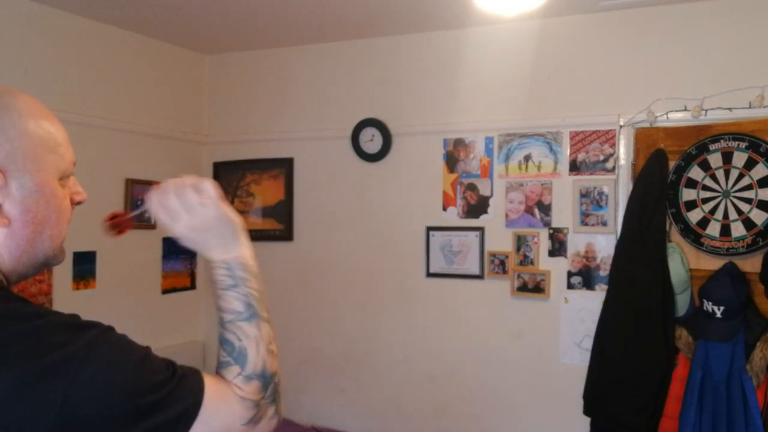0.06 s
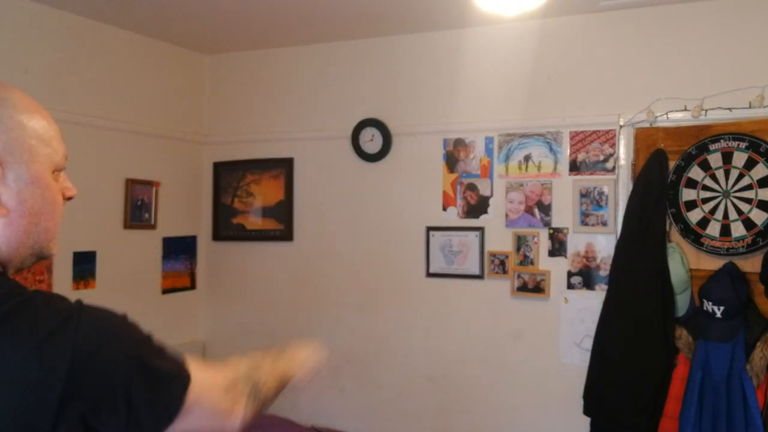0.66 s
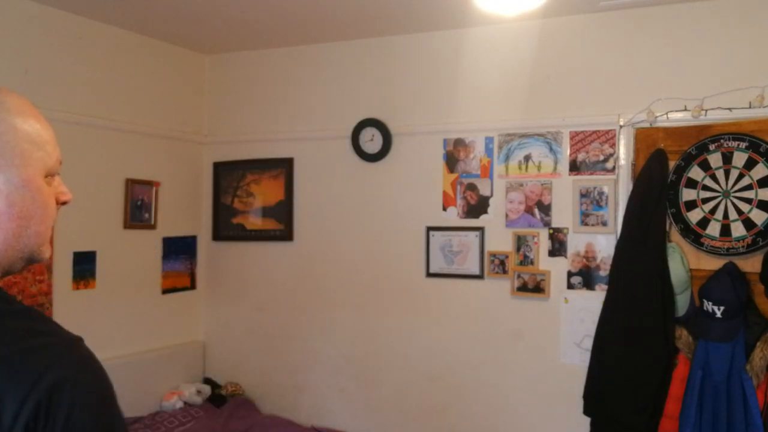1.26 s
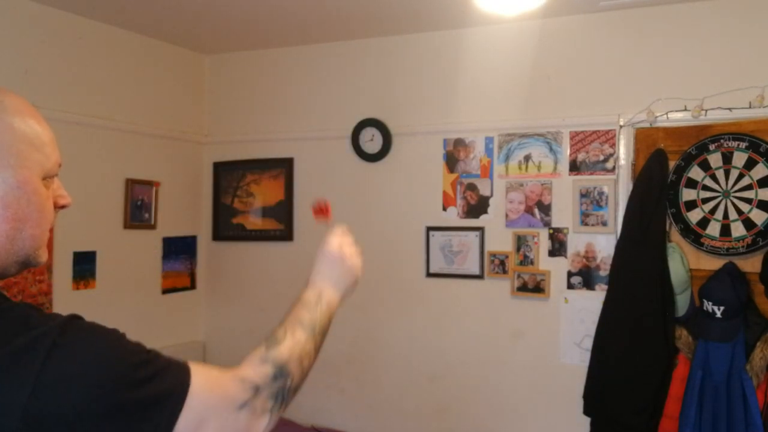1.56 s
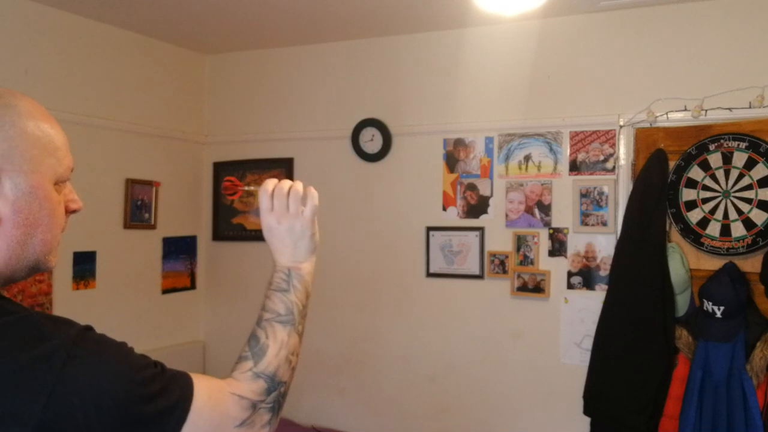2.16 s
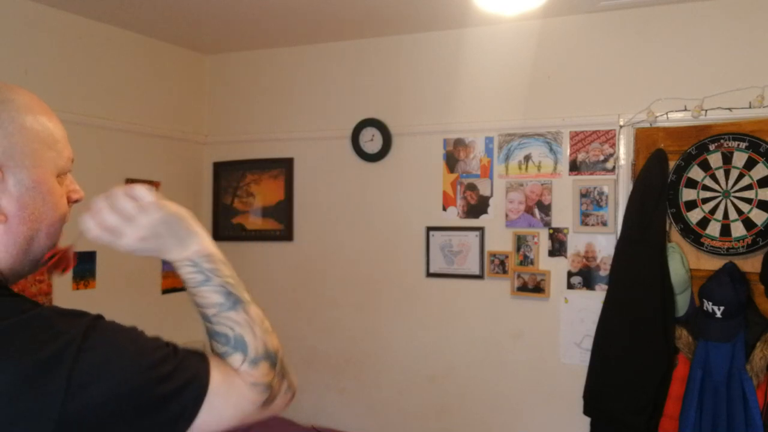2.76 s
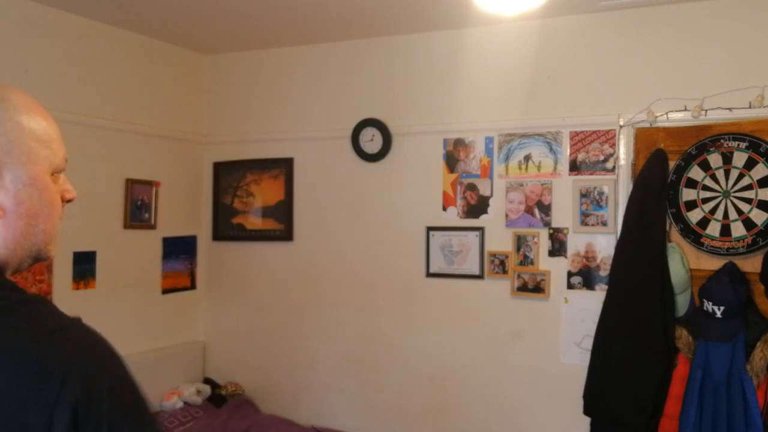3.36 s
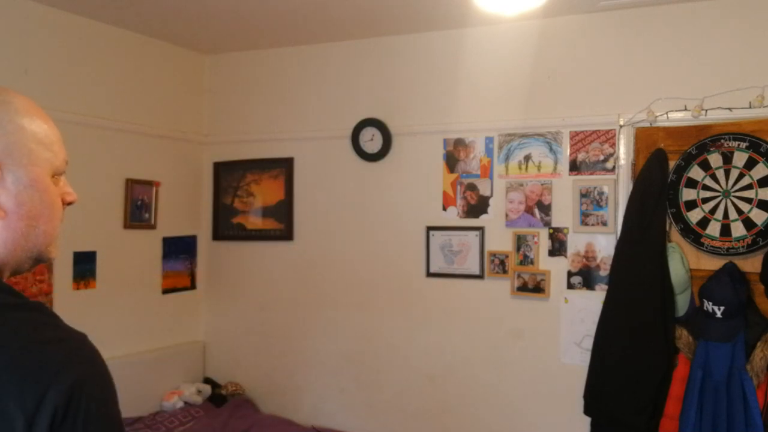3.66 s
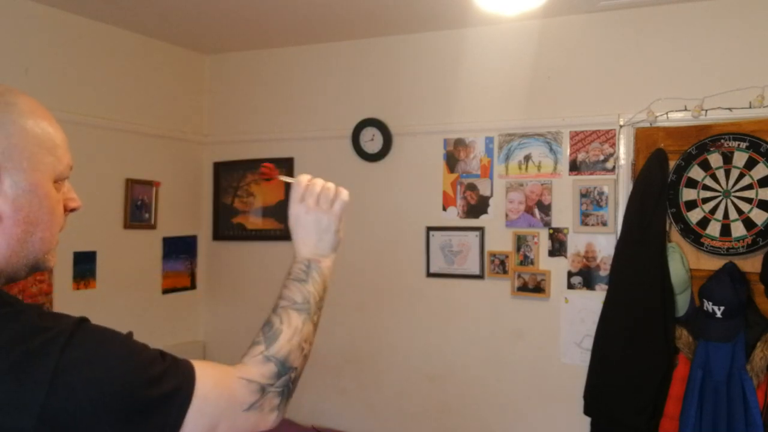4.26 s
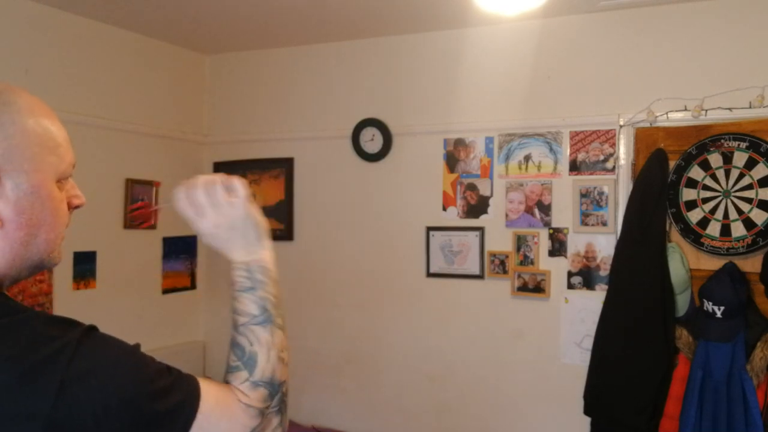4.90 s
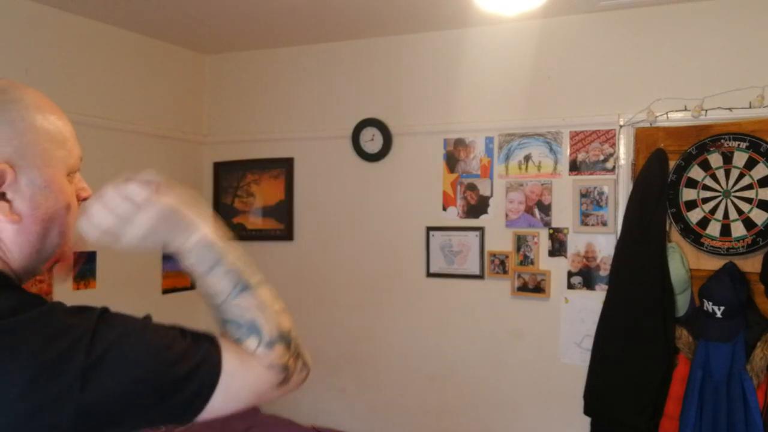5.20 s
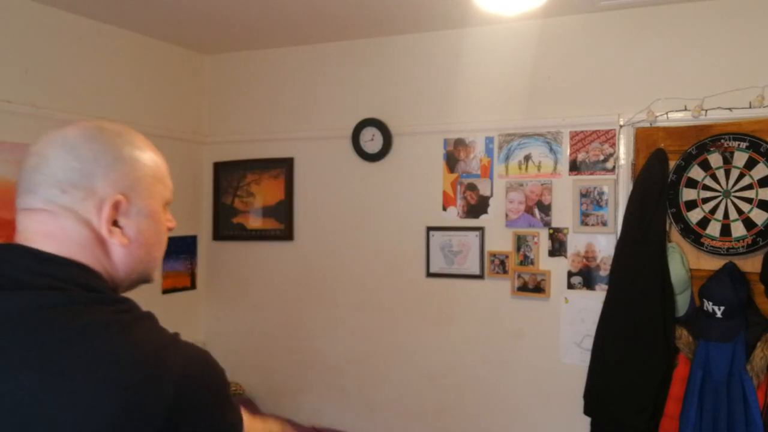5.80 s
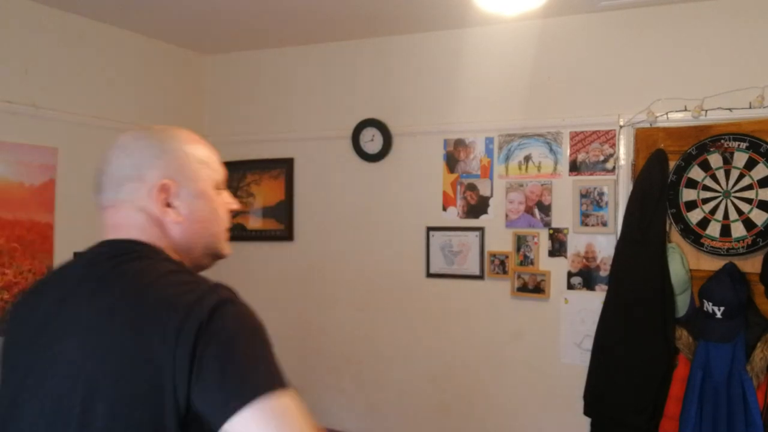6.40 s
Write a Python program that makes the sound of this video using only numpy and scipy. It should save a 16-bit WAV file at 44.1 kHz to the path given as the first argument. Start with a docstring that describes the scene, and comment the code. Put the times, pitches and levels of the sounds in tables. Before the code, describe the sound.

In a small, quiet bedroom, three darts thud into a bristle board on a wooden door, about two and a half seconds apart. Each lands with a knock and a short low boom, and the last two add a brief rattle and a sharp tick. The thrower's clothes brush faintly, with soft knocks underfoot and a rustle at the end. A fan hums very faintly in the stereo room tone.

```python
"""In a small, quiet bedroom, three darts thud into a bristle board hung on a wooden door. Each impact excites
free vibration: the flight rattles, the steel point ticks, the board's knock rings in the room's resonances and
the low modes of door and room boom; reflections and a short reverberation follow. The thrower moves with soft
brushing sounds and dull knocks underfoot, then rustles and steps forward. A small fan hums faintly in the
steady room tone."""
import sys
import numpy as np
from scipy import signal
from scipy.fft import rfft, irfft, next_fast_len
from scipy.io import wavfile
from scipy.ndimage import uniform_filter1d

SR = 44100
rng = np.random.default_rng(int(sys.argv[2]) if len(sys.argv) > 2 else 0)


def waveform_to_disk(signal):
    """Save audio, clipped to [-1, 1], as 16-bit WAV at the path in sys.argv[1]."""
    frames = np.transpose(np.atleast_2d(signal))
    scaled = np.clip(frames, -1, 1) * 32767
    samples = np.round(scaled).astype(np.int16)
    wavfile.write(sys.argv[1], SR, samples)


N = 284129
TIME = np.arange(N) / SR
NOISE_HZ = np.fft.rfftfreq(2 * next_fast_len(N), 1 / SR)
RING_SIZE = 32768   # samples allowed for a free decay
RING_TIME, RING_HZ = TIME[:RING_SIZE], np.fft.rfftfreq(RING_SIZE, 1 / SR)


def from_db(db):
    """Amplitude ratio: a factor of ten for every 20 dB."""
    return 10 ** (np.asarray(db) / 20)


def unit_rms(x):
    """Normalisation to unit mean power."""
    return x / np.sqrt(np.mean(x ** 2) + 1e-20)


def at_hz(points, hz):
    """Interpolation of a table on a log-frequency axis."""
    frequencies, values = np.transpose(points)
    return np.interp(np.log(np.maximum(hz, 1)), np.log(frequencies), values)


def add(out, start_s, sound):
    """Superposition: a sound joins the mix at its start time."""
    start = int(round(start_s * SR))
    out[:, start:start + sound.shape[-1]] += sound[..., :N - start]


def soften(x, cutoff_hz):
    """Low-pass filtering: a soft contact carries little treble."""
    return signal.sosfilt(signal.butter(2, cutoff_hz, fs=SR, output="sos"), x)


def click(spectrum):
    """Minimum phase: the shortest causal pulse that has this spectrum."""
    cepstrum = irfft(np.log(from_db(at_hz(spectrum, RING_HZ))))
    cepstrum[1:] *= 2
    return irfft(np.exp(rfft(cepstrum[:RING_SIZE // 2], RING_SIZE)))


def decay(t60_s):
    """Exponential damping: a fall of 60 dB in t60_s."""
    return from_db(-60 * RING_TIME / t60_s)


def ring(modes):
    """Free vibration: each struck mode is a damped sinusoid."""
    return sum(np.sign(polarity) * from_db(level_db) * decay(t60_s) * np.sin(2 * np.pi * hz * RING_TIME)
               for hz, level_db, t60_s, polarity in modes)


def whitened(sound):
    """Whitening: many paths or contacts share energy evenly, giving a spectrum without broad bumps."""
    spectrum = rfft(sound, RING_SIZE)
    smooth_power = uniform_filter1d(uniform_filter1d(np.abs(spectrum) ** 2, size=35), size=35)
    return spectrum / np.sqrt(smooth_power)


def left_right(mid, side, correlation):
    """Partial coherence: mid and side spectra mix into a stereo pair with this correlation."""
    return irfft(np.sqrt((1 + correlation) / 2) * mid + np.sqrt((1 - correlation) / 2) * side * [[1], [-1]])


def stereo_noise(gain, correlation):
    """Spectral shaping: noise of unit rms with a gain and a correlation at each frequency."""
    mid, side = gain * rfft(rng.standard_normal((2, 2 * len(gain) - 2)))
    return unit_rms(left_right(mid, side, correlation))


# background rumble and hiss: frequency_hz, relative_density_db
AIR_SPECTRUM = [(12, -43), (20, 2), (22, -15), (42, -5), (144, -9.5), (238, -9.5), (274, -18.5), (324, -15),
                (416, -14.5), (667, -15), (725, -17.5), (1040, -16), (2150, -21), (8880, -22.5),
                (15500, -31.5)]
# likeness of the background at left and right: frequency_hz, correlation
AIR_CORRELATION = [(60, 1), (180, 0.88), (550, -0.76), (1650, 0.06), (4970, -0.02), (15000, -0.2)]
# the fan's noise bands: centre_hz, half_width_hz, level_db
FAN_BANDS = [(47, 6, -76.5), (105.3, 9.2, -79), (243.6, 14, -85.5), (3320, 300, -85.5)]

def room_tone(air_db=-69):
    """Incoherent addition: the background and the fan's noise bands sum in power."""
    power = (from_db(air_db) * unit_rms(from_db(at_hz(AIR_SPECTRUM, NOISE_HZ)))) ** 2
    for centre_hz, half_width_hz, level_db in FAN_BANDS:
        band = unit_rms(1 / (1 + ((NOISE_HZ - centre_hz) / half_width_hz) ** 2))
        power += (from_db(level_db) * band) ** 2
    noise = stereo_noise(np.sqrt(power), at_hz(AIR_CORRELATION, NOISE_HZ))
    return np.sqrt(power.mean()) * noise[:, :N]


# the fan's tones: harmonic_number, level_db
FAN_HARMONICS = [(5, -86), (14, -93), (21, -93), (22, -94), (23, -102.5), (24, -96)]

def fan(rotation_hz=48.8):
    """Periodic rotation radiates harmonics of its rate, in a different phase at left and right."""
    out = np.zeros((2, N))
    for harmonic, level_db in FAN_HARMONICS:
        cycles = round(harmonic) * rotation_hz * TIME + rng.random((2, 1)) / 4
        out += np.sqrt(2) * from_db(level_db) * np.sin(2 * np.pi * cycles)
    return out


# hiss of a brushing stroke: frequency_hz, relative_density_db
BRUSH_SPECTRUM = [(60, -55.5), (220, -22), (400, -4), (1200, -7.5), (2200, -10.5), (4500, -10),
                  (7500, -10.5), (9500, -7), (11500, -21), (15000, -23)]
# strokes as the thrower moves: peak_s, level_db, time_constant_s, bright_hz
BRUSH_STROKES = [(.55, -75, 0.065, 9000), (.655, -74, .035, 4000), (1.205, -74, 0.027, 6500),
                 (3.109, -76.5, 0.054, 8900), (6.244, -56.5, 0.035, 7300)]

def brushing(lift_db=7, half_width_octaves=0.23):
    """Amplitude-modulated noise: each stroke swells and fades exponentially, with one band lifted."""
    out = np.zeros((2, N))
    hz = np.fft.rfftfreq(2 * next_fast_len(N // 2 + 1), 1 / SR)
    for peak_s, level_db, time_constant_s, bright_hz in BRUSH_STROKES:
        octaves = np.log2(np.maximum(hz, 1) / bright_hz)
        band_db = lift_db / (1 + (octaves / half_width_octaves) ** 2)
        hiss = stereo_noise(from_db(at_hz(BRUSH_SPECTRUM, hz) + band_db), correlation=0.18)[:, :N]
        out += from_db(level_db) * hiss * np.exp(-np.abs(TIME - peak_s) / time_constant_s)
    return out


# reverberation time by band: centre_hz, t60_s
REVERB_TIMES = [(100, 0.3), (400, 0.23), (1100, 0.22), (3000, 0.18), (8000, 0.18), (15000, 0.23)]
# direct sound and first reflections: left_delay_s, right_delay_s, relative_db
EARLY_PATHS = [(.0006, .0001, -16.5), (.0047, .0047, -16), (0.0112, .0112, -9.5)]
# likeness of the room's sound field at left and right: frequency_hz, correlation
ROOM_CORRELATION = [(120, 0.66), (230, .78), (340, 0.59), (500, 0.12), (770, 0.037), (1200, -0.086),
                    (2700, -0.24), (8000, 0)]

def through_room(sound, tail_db=-3, tail_rise_s=0.00061):
    """Convolution with the room's response: a few clear paths, then a diffuse tail dying band by band."""
    noise = rfft(rng.standard_normal((2, RING_SIZE)))
    centres_hz = [hz for hz, _ in REVERB_TIMES]
    tail = np.zeros((2, RING_SIZE))
    for weights, (_, t60_s) in zip(np.eye(len(centres_hz)), REVERB_TIMES):
        band = at_hz(list(zip(centres_hz, weights)), RING_HZ)
        tail += irfft(noise * band) * decay(t60_s)
    tail *= 1 - np.exp(-RING_TIME / tail_rise_s)
    left, right = from_db(tail_db) * unit_rms(tail) / np.sqrt(RING_SIZE)
    for left_delay_s, right_delay_s, relative_db in EARLY_PATHS:
        left[int(left_delay_s * SR)] += from_db(relative_db)
        right[int(right_delay_s * SR)] += from_db(relative_db)
    response = left_right(whitened(left + right), whitened(left - right), at_hz(ROOM_CORRELATION, RING_HZ))
    return signal.fftconvolve(sound[None], response[:, :RING_SIZE // 2], axes=1)


# one contact of flight and shaft: frequency_hz, level_db
RATTLE_SPECTRUM = [(600, -23.5), (2100, -17.5), (3100, 6.5), (4100, -6), (5200, 0), (6100, -1), (7000, 0),
                   (9000, -5), (10200, -3.5), (11000, -11), (13000, -18.5), (15500, -21)]

def flight_rattle(t60_s=0.033):
    """Repeated impact: the flight chatters in its shaft in a dense, quickly dying run of contacts."""
    contacts = rng.standard_normal(RING_SIZE) * decay(t60_s)
    chatter = irfft(whitened(contacts))[:SR // 20]
    return through_room(signal.fftconvolve(click(RATTLE_SPECTRUM), chatter))


# contact of the steel point: frequency_hz, level_db
TICK_SPECTRUM = [(2000, -53.5), (6000, -16.5), (7800, -14.5), (8900, 11.5), (10200, -10), (11500, -21),
                 (15500, -27)]

def point_tick():
    """Hard impact: the point's brief contact puts its energy in the treble."""
    return through_room(click(TICK_SPECTRUM))


# resonances of the room that colour the board's knock: pitch_hz, level_db, t60_s
KNOCK_RESONANCES = [(310, -34, 0.25), (326, -30, 0.19), (365, -38, 0.068), (415, -33, 0.17), (475.7, -31, 0.19),
                    (558, -36, 0.095), (572.5, -31.5, .11), (625, -28.5, .14), (675.4, -32, 0.08),
                    (735, -36, 0.091), (801, -27.5, 0.097), (853, -26.5, .12), (902, -27.5, 0.12),
                    (947, -35, 0.23), (1092, -29, 0.15), (1129, -31, .09), (1212, -37, .06), (1349, -42, 0.05),
                    (1470, -40.5, 0.074), (1505, -41, .08)]

def board_knock(lowest_mode_db, braking_s=0.0015, scatter_t60_s=0.065):
    """Modal excitation: the spot that is hit sets the strength and polarity of each mode."""
    offsets_db, polarities = rng.standard_normal((len(KNOCK_RESONANCES), 2)).T
    offsets_db[0] += lowest_mode_db
    pitches_hz, levels_db, t60s_s = np.transpose(KNOCK_RESONANCES)
    struck = ring(zip(pitches_hz, levels_db + offsets_db, t60s_s, polarities))
    spectrum = rfft(struck * (1 - np.exp(-RING_TIME / braking_s)))   # the bristles brake the dart
    # scattering off nearby walls makes left and right differ
    scatter = whitened(rng.standard_normal(RING_SIZE) * decay(scatter_t60_s))
    return left_right(spectrum, spectrum * scatter, at_hz(ROOM_CORRELATION, RING_HZ))[:, :RING_SIZE // 2]


# thud of the barrel's weight: frequency_hz, level_db
PUNCH_SPECTRUM = [(150, -7.5), (260, 6), (350, 16), (800, 15), (1400, 10), (2000, 2), (3000, -2),
                  (4500, -6.5), (7000, -23), (15000, -10)]

def barrel_punch():
    """Momentum transfer: the barrel's weight drives the board with one short pulse."""
    return through_room(click(PUNCH_SPECTRUM))


# low modes of door and room: pitch_hz, level_db, t60_s, polarity
DOOR_MODES = [(41, -46, .55, -1), (74, -30, .25, 1), (77.6, -35, .42, -1), (96.5, -42, .5, 1),
              (112.8, -30, .19, 1), (124.7, -33.5, .42, -1), (139.8, -37, .15, -1), (175, -41, .24, 1),
              (208, -40.5, .27, -1)]

def door_boom(rise_s=0.02):
    """Standing waves take time to build; their long wavelengths reach left and right alike."""
    return (1 - np.exp(-RING_TIME / rise_s)) * ring(DOOR_MODES)


# dart impacts, with a gain for each part:
# start_s, knock_db, boom_db, rattle_db, tick_db, tick_lead_s, cutoff_hz, lowest_mode_db
DART_HITS = [(0.794, -1, 3.5, -23.5, -22.5, .002, 3348, -2),
             (3.3397, -4.5, 2.5, -3, -12, 0.0015, 3020, 1.5),
             (5.6841, -3.5, 1.5, 3, -4.5, 0.0045, 3230, 4.5)]

def darts(rattle_lead_s=0.003, left_minus_right_db=-1.6):
    """Impact excitation: tick and rattle sound just before board and door respond."""
    out = np.zeros((2, N))
    pan = from_db([[left_minus_right_db / 2], [-left_minus_right_db / 2]])
    for start_s, knock_db, boom_db, rattle_db, tick_db, tick_lead_s, cutoff_hz, lowest_mode_db in DART_HITS:
        for knock in board_knock(lowest_mode_db), barrel_punch():
            add(out, start_s, pan * from_db(knock_db) * soften(knock, cutoff_hz))
        add(out, start_s, from_db(boom_db) * door_boom())
        add(out, start_s - rattle_lead_s, pan * from_db(rattle_db) * flight_rattle())
        add(out, start_s - tick_lead_s, pan * from_db(tick_db) * point_tick())
    return out


# one contact underfoot: frequency_hz, level_db
UNDERFOOT_SPECTRUM = [(80, -35.5), (200, -4.5), (400, -4.5), (700, -8), (1100, 0.5), (1600, -6.5),
                      (2300, -12), (3200, -22.5), (6000, -27), (15000, -31.5)]
# double knocks underfoot: start_s, gain_db, cutoff_hz, gap_s, second_relative_db
UNDERFOOT_KNOCKS = [(3.263, -8.5, 5000, .014, -1.5), (5.79, -7.5, 2040, .016, -11),
                    (5.991, -3.5, 3500, 0.0049, -6.5)]

def weight_shifts():
    """Soft impact: pairs of dull contacts sound underfoot as the thrower shifts his weight."""
    out = np.zeros((2, N))
    for start_s, gain_db, cutoff_hz, gap_s, second_relative_db in UNDERFOOT_KNOCKS:
        contact = from_db(gain_db) * soften(click(UNDERFOOT_SPECTRUM), cutoff_hz)
        add(out, start_s, through_room(contact))
        add(out, start_s + gap_s, from_db(second_relative_db) * through_room(contact))
    return out


def rustle(start_s=6.144, attack_s=0.05, gain_db=-73.5, growth_db_per_s=30):
    """Friction noise in one broad resonance grows as the step gathers pace."""
    centre_hz, half_width_hz = 1390, 220
    resonance = NOISE_HZ / np.hypot(NOISE_HZ ** 2 - centre_hz ** 2, 2 * half_width_hz * NOISE_HZ)
    rubbing = stereo_noise(resonance, correlation=0.083)[:, :N]
    age_s = np.maximum(TIME - start_s, 0)
    envelope = np.minimum(age_s / attack_s, 1) * from_db(gain_db + growth_db_per_s * age_s)
    return envelope * soften(rubbing, cutoff_hz=4000)


def footfall(start_s=6.376, pitch_hz=19, level_db=-43, t60_s=1.0):
    """Damped oscillation: the step sways the floor in one very low mode."""
    out = np.zeros((2, N))
    sway = ring([(pitch_hz, level_db, t60_s, 1)])
    add(out, start_s, soften(sway, cutoff_hz=67.5))
    return out


def scene():
    """Linear superposition of darts, thrower and the quiet room."""
    return darts() + weight_shifts() + brushing() + rustle() + footfall() + room_tone() + fan()


def record(dry, cutoff_hz=15600):
    """Band limiting: a steep elliptic low-pass removes the highest treble."""
    return signal.sosfilt(signal.ellip(10, .1, 80, cutoff_hz, fs=SR, output="sos"), dry)


dry = scene()
out = record(dry)
waveform_to_disk(out)
```